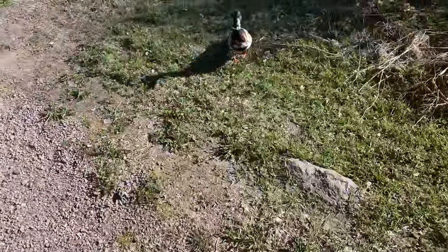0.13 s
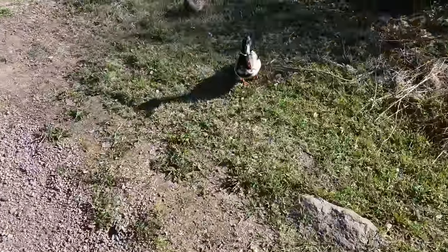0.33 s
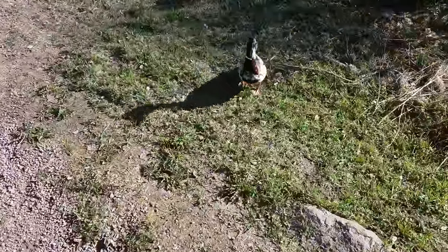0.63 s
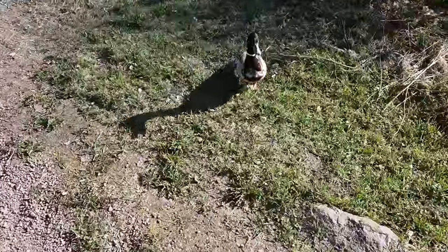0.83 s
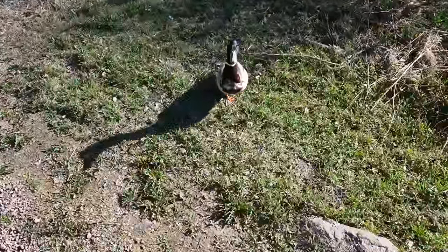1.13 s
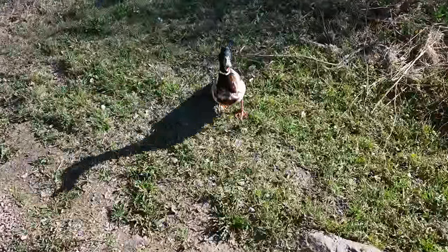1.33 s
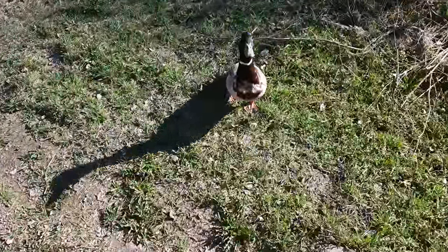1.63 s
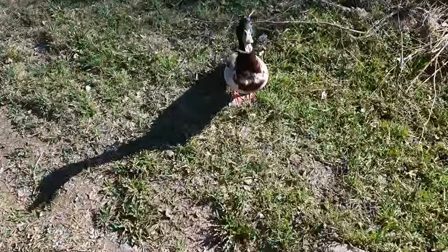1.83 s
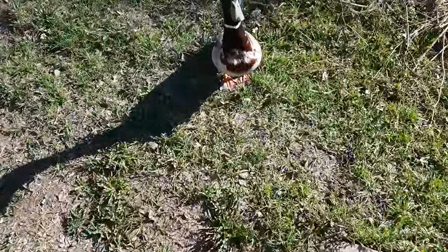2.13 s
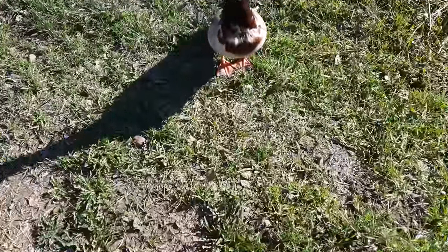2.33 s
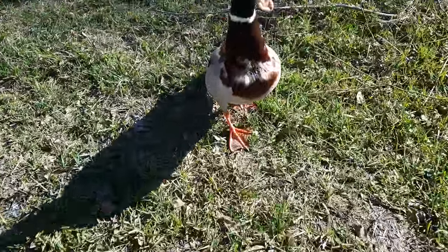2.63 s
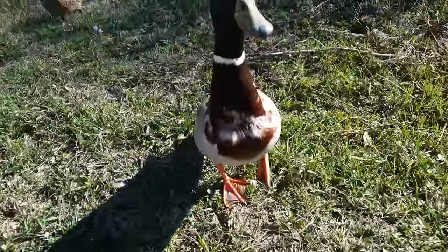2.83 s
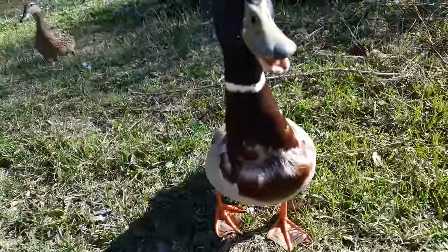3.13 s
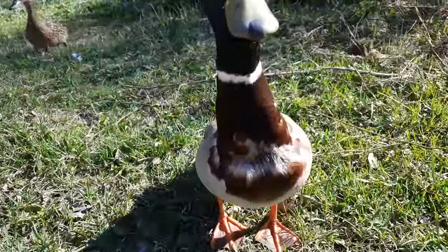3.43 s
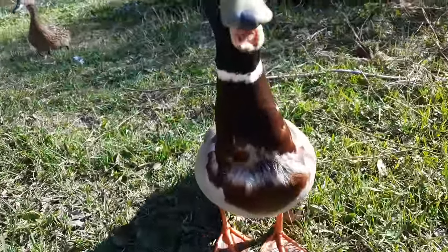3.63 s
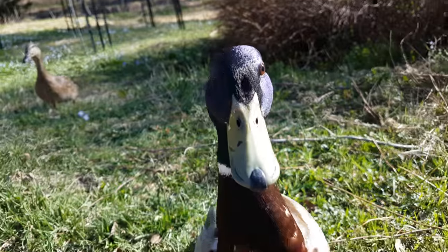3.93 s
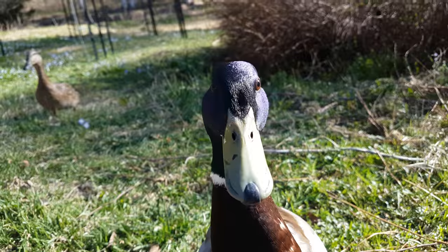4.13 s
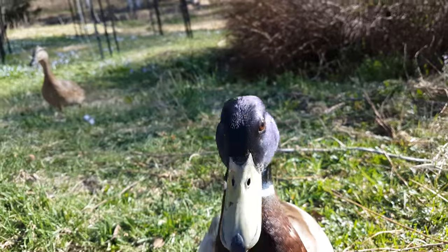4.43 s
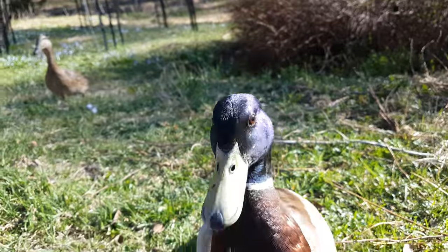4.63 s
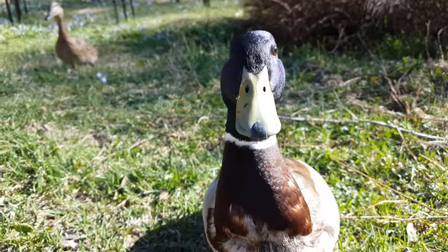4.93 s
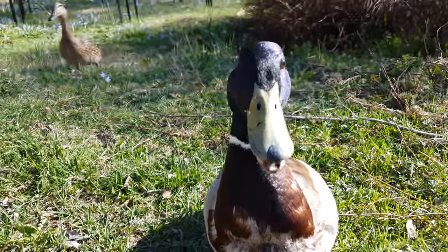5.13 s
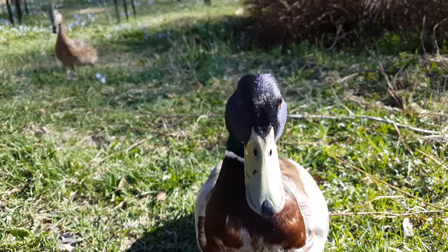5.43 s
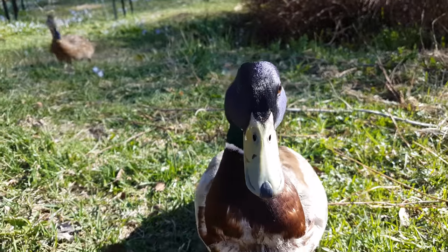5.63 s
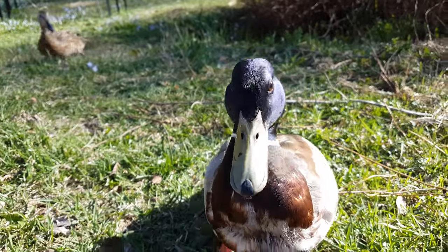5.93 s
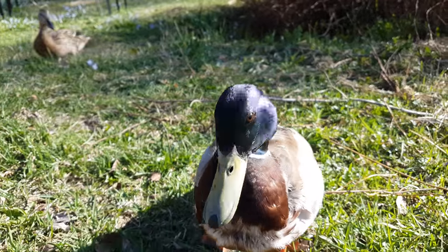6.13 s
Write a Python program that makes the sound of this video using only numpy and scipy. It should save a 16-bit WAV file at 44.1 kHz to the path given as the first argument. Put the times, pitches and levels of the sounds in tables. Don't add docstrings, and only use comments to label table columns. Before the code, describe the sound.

Dry, rattling duck quacks grow louder outdoors as feet tick and brush through grass, a twig cracks sharply, and a distant motor revs.

```python
import sys
import numpy as np
from scipy import signal
from scipy.io import wavfile
from scipy.ndimage import uniform_filter1d, map_coordinates

SR = 44100
rng = np.random.default_rng(int(sys.argv[2]) if len(sys.argv) > 2 else 0)


def to_wav(sig):
    pcm = np.clip(np.atleast_2d(sig), -1, 1) * 32767
    pcm = np.round(pcm).astype(np.int16)
    wavfile.write(sys.argv[1], SR, pcm.T)


def how_loud(loudness_db):
    steps = np.asarray(loudness_db, float) / 20
    return 10 ** steps


N = 277389


def unit(x):
    return x / np.sqrt(np.mean(x ** 2) + 1e-18)


def ring(x, hz, width_hz):
    return signal.lfilter(*signal.iirpeak(hz, hz / width_hz, SR), x)


def band(x, lo_hz, hi_hz, order=2):
    sos = signal.butter(order, [lo_hz, min(hi_hz, SR / 2.1)], "band", fs=SR, output="sos")
    return signal.sosfilt(sos, x)


def walk(rate_hz, size):
    k = max(int(SR / rate_hz), 2)
    steps = np.repeat(rng.standard_normal(size // k + 1), k)
    return 1.323 * uniform_filter1d(uniform_filter1d(steps, k), k)[:size]


def pan(x, db):
    return x * how_loud(np.array([[db / 2], [-db / 2]]))


def on_log(hz, table):
    row_hz, value = np.transpose(table)
    return np.interp(np.log(hz), np.log(row_hz), value)


def burst(t60_s, lo_hz, hi_hz, grit, apart):
    u = np.arange(2048) / SR - .0005
    noise = rng.standard_normal((3, len(u)))
    envelope = np.exp(np.minimum(u / 0.00033, -np.log(1000) * u / max(t60_s, .001)))
    x = grit * (noise[0] + apart * noise[1:]) * envelope
    x[:, np.argmax(u >= 0)] += 1
    x += 1e-9 * noise[1:]
    x = band(x, lo_hz, hi_hz)
    return x / np.abs(x).max()


def place(out, s, x):
    i = int(s * SR)
    out[:, i:i + 2048] += x


def air():
    # start_s, traffic_db, rustle_db, tyre_whoosh_db
    air_levels = [
        (0.0, -35, -50.5, 4),
        (2.03, -38, -54, 3),
        (2.98, -39, -49, 1.5),
        (3.68, -40.5, -56, 0),
        (5.45, -39, -58.5, 1.5),
        (6.29, -40.5, -54.5, 0),
    ]
    # hz, density_db
    air_colour = [(15, -49), (25, -12.5), (70, -10.5), (114, -12), (232, -14), (524, -10.5), (787, -11.5),
                  (3410, -25), (3700, -25.5), (9580, -35.5), (15200, -29.5), (16500, -56)]
    # hz, left_right_likeness
    air_alike = [(60, 0.29), (150, 0.56), (300, 0.7), (700, 0.37), (1400, 0.017), (16000, 0.01)]
    # hz, left_minus_right_db
    air_pan = [(60, 3), (200, 2.5), (1300, 1.5), (2400, -0.5), (15000, 2.5)]
    s, low_db, high_db, tyre_db = np.transpose(air_levels)
    t = np.arange(N) / SR
    low, high, tyres = np.interp(t, s, low_db), np.interp(t, s, high_db), np.interp(t, s, tyre_db)
    swell, grain = walk(5.34, N), walk(60, N)
    out = np.zeros((2, N))
    for hz in 25 * 2 ** np.arange(0, 9.6, .5):
        bright = np.clip(np.log2(hz / 600) / 2.7, 0, 1)
        alike = np.clip(on_log(hz, air_alike), 0, 1)
        mid, side = band(rng.standard_normal((2, N)), hz / 2 ** .25, hz * 2 ** .25)
        pair = np.sqrt(1 + alike) * mid + np.sqrt(1 - alike) * side * np.array([[1], [-1]])
        db = on_log(hz, air_colour) + (1 - bright) * (low + 47) + bright * (high + 60 + 1.9 * grain)
        db = db + tyres * np.exp(-np.log2(hz / 1450) ** 2 / 0.48)
        db = db + 0.45 * swell + (2.0 - 2.0 * bright) * walk(12, N) - 28
        out += pan(pair, on_log(hz, air_pan)) * how_loud(db)
    return out


def bird():
    # start_s, end_s, start_hz, end_hz, level_db
    whistles = [
        (0.001, 0.047, 7600, 7000, -55),
        (0.067, 0.18, 7440, 7150, -52.5),
        (.25, 0.34, 7400, 6960, -52.5),
        (3.882, 4.05, 2910, 3690, -60),
    ]
    out, t = np.zeros(N), np.arange(N) / SR
    for start, end, hz0, hz1, db in whistles:
        shape = np.clip(np.minimum(t - start, end - t) / 0.0072, 0, 1)
        hz = np.interp(t, [start, end], [hz0, hz1]) + 60 * walk(77, N)
        out += how_loud(db + 2.5 * walk(60, N)) * shape * np.sin(2 * np.pi * np.cumsum(hz) / SR)
    return pan(out, 0.1)


def knocks():
    # start_s, peak_db, pitch_hz, left_minus_right_db
    stones = [(0.042, -25, 2320, -4), (1.357, -41, 3500, 1.5), (1.5685, -19.5, 2300, -8),
              (1.582, -13.5, 2000, -1), (1.616, -23, 2440, -11), (1.776, -28, 2800, -5),
              (2.1146, -12.5, 1900, 10), (2.1157, -31, 1500, 3), (3.2065, -5, 3300, -4),
              (3.2076, -8, 1800, -2), (3.342, -30, 4500, 0), (4.5052, -28.5, 7500, 14),
              (4.823, -18, 1820, -1)]
    out = np.zeros((2, N + 2048))
    for s, db, hz, pan_db in stones:
        place(out, s, pan(how_loud(db) * burst(0.0035, hz / 2.28, hz, 0.29, 0.89), pan_db))
    return out[:, :N]


def smacks():
    # start_s, crack_peak_db, mouth_pop_db, middle_db, left_minus_right_db
    bill_smacks = [(0.1294, -14.5, -32, -26, 3), (0.4777, -19, -31, -27, 5), (0.896, -17.5, -32, -26, -1),
                   (1.3671, -13, -28, -23, 3), (1.9035, -21, -26, -26, 3.5), (2.269, -12.5, -25, -19.5, 3),
                   (2.688, -10, -22.5, -19.5, 2), (3.0989, -7, -20, -15.5, 2.5),
                   (3.6037, -26, -20, -20, 2.5), (4.2249, -36, -23, -27, 3.5),
                   (4.6103, -14, -22.5, -16.5, 7), (5.112, -11.5, -23, -27, 4.5),
                   (5.8256, -18.5, -25.5, -23, 4.5)]
    t60_s = 0.015
    out = np.zeros((2, N + 2048))
    for s, crack_db, pop_db, mid_db, pan_db in bill_smacks:
        x = how_loud(crack_db - 5.5) * burst(t60_s, 2300, 9800, 0.37, 0.94)
        x = x + how_loud(mid_db + 5.5) * burst(t60_s, 1030, 4100, 0.26, 0.98)
        x = x + how_loud(pop_db + 9.5) * burst(0.025, 456, 1180, 0.064, 0.26)
        place(out, s, pan(x, pan_db))
    return out[:, :N]


def effort(t, first, last, peak_db, rise_s, tiring_db, onset_db, release_db_per_s):
    # centre_s, change_db, half_length_s
    brief_changes = [(.545, -2, .01), (0.95, -0.5, .01), (.175, -1, .008), (.6, -1.5, .008), (.149, 2.5, .006),
                     (0.499, 1.5, .006), (0.527, -2, .006), (1.92, 1.5, .008), (2.308, 2.5, 0.011),
                     (2.277, -3, .005), (3.239, 3, .01), (3.628, 3, 0.0052), (3.704, -3.5, 0.0059),
                     (5.156, 3.5, 0.0063), (5.201, 1.5, .012), (5.233, -2, .007), (5.248, -4, 0.0064),
                     (5.126, -1, .008), (5.856, 2.5, .007), (2.83, -1.5, 0.0092), (3.139, 1.5, .008),
                     (3.162, -4, 0.0087), (3.211, 4.5, 0.0055), (3.642, 2, .015), (4.635, 3.5, 0.0059),
                     (4.702, 3.5, 0.014), (3.678, -4.5, 0.01), (3.726, -1, .02), (4.305, -3, .015),
                     (4.34, 1, .015), (4.68, -1, 0.011), (5.177, -0.5, 0.0078), (5.23, 1.5, 0.024),
                     (5.304, 5.5, 0.013), (5.84, -2, .008), (5.94, 2, 0.0069), (5.973, -3.5, 0.014)]
    peak = first - 0.014 + rise_s
    rise = onset_db * np.clip((peak - t) / rise_s, 0, 1)
    hold = tiring_db * np.clip((t - peak) / max(last - peak, .004), 0, 1) ** 2.38
    brief_change_db = sum(db * np.exp(-((t - s) / half_s) ** 2) for s, db, half_s in brief_changes)
    return peak_db + rise - hold - release_db_per_s * np.maximum(t - last, 0) + brief_change_db


def flutter(t, first, last, slowing):
    rate0_hz = 73.5
    rate1_hz = rate0_hz - 120 * (last - first)
    leak, gating = .14, 1.2
    beats = int(round((last - first) * (1 / (.5 / rate0_hz + .5 / rate1_hz))))
    periods = np.linspace(1 - slowing, 1 + slowing, beats)
    periods = periods * (last - first) / periods.sum()
    steps = np.r_[0, periods[[0, 0]], periods, periods[[-1, -1, -1]]]
    times = first - 2 * periods[0] + np.cumsum(steps)
    chance = np.clip(rng.standard_normal((40, 5)), -1.5, 1.5)
    times = times - .0022 + .0004 * chance[:len(times), 0]
    nearest = np.searchsorted((times[1:] + times[:-1]) / 2 + 0.0013, t)
    u = t - times[nearest]
    beat = chance[nearest].T

    sweep_s = 0.005977 * (1 + .2 * beat[1])
    hz = 1750 * (1 + 0.0609 * beat[2]) * np.exp(u / sweep_s) * (1 + 0.06 * walk(900, len(t)))
    hz = np.clip(hz, 900, 3000)
    size = how_loud(0.79 * beat[3])
    murmur = 0.29 * how_loud(4.8 * beat[0]) * np.exp(-((u + 0.0069) / 0.0036) ** 2)
    growth = np.exp((u - .0012) / 0.0044) + murmur
    swell = size * np.where(u < .0012, growth, np.exp((.0012 - u) / 0.0027))

    hiss = rng.standard_normal(len(t))
    tone = np.sin(2 * np.pi * np.cumsum(hz) / SR) * how_loud(1.5 * walk(600, len(t)))
    snap = size * how_loud(1.7 * beat[4]) * (u - .001) * np.exp(-((u - .001) / 0.00021) ** 2)
    rasp = (swell + 0.25) * band(hiss, 630, 3300)
    voiced = unit(swell * tone) + how_loud(-16.5) * unit(snap) + how_loud(-4) * unit(rasp)
    breath = unit((swell ** gating + leak) * hiss) + how_loud(-4) * unit(snap)
    return voiced, unit(breath)


def windpipe(voiced, t, sag, shut, slack_db, neck_hz, neck_db, sinking, swell_db):
    neck_width_hz = [197, 112, 144, 167, 219]
    pipe = 0
    for k, (hz, width, db) in enumerate(zip(neck_hz, neck_width_hz, neck_db)):
        early = ring(voiced, (1.014 + sinking / 2) * hz, width)
        late = ring(voiced, (1.011 - sinking / 2) * hz, width)
        mode = (1 - sag) * early + sag * late
        mode = (1 - shut) * mode + shut * ring(voiced, 0.94 * hz, width)
        mode = unit(ring(mode, hz, 2.76 * width))
        db = db + 1.77 * walk(33.0, len(t))
        db = db - 2.1 * shut * (k != 1) - 0.77 * shut * max(k - 1, 0)
        db = db + (swell_db * sag ** 2 - 3.0) * (k == 0)
        db = db + (k - 1.4051) * (0.38 * slack_db - 5.5 * (t - t[0]) * (k > 0))
        pipe = pipe + (-1) ** k * how_loud(db) * mode
    return unit(pipe)


def head(breath, cavity, top_db):
    # pitch_hz, width_hz, level_db
    cavities = [(3500, 390, 1), (3925, 340, 0), (4600, 370, -2), (5210, 290, -1.5), (6020, 430, 1.5),
                (6780, 580, -2), (8330, 470, -7.5), (8650, 200, -11), (10500, 7400, -10.5)]
    out = 0
    for k, (hz, width, db) in enumerate(cavities):
        mode = ring(ring(breath, cavity * hz, 0.77 * width), cavity * hz, 1.8 * width)
        db = db + top_db * (k > 5) + 3.6 * walk(26.0, len(breath))
        out = out + (-1) ** k * how_loud(db) * unit(mode)
    return unit(band(out, 3100, 17000))


def drake():
    # first_flutter_s, last_flutter_s, peak_db, rise_s, tiring_db
    syllables = [(.149, 0.19, -21.5, 0.0038, 3.5), (0.206, 0.266, -25, 0.046, 13),
                 (0.4959, 0.5522, -21, 0.015, 8), (0.57, 0.628, -24, 0.056, 9.5),
                 (0.906, 1.0202, -23, 0.023, 7.5), (1.0816, 1.1156, -28.5, 0.014, 5.5),
                 (1.379, 1.421, -24.5, 0.03, 2.5), (1.4582, 1.516, -26.5, 0.044, -0.5),
                 (1.912, 1.967, -23, 0.033, 2), (1.984, 2.045, -24, 0.013, 2.5),
                 (2.2894, 2.33, -14, 0.029, 6.5), (2.4087, 2.4538, -20, 0.04, 3.5),
                 (2.7075, 2.749, -15.5, 0.015, 4), (2.7897, 2.867, -17, 0.05, 13.5),
                 (3.1084, 3.183, -12.5, 0.022, 14), (3.199, 3.263, -15, 0.044, 8.5),
                 (3.616, 3.74, -13.5, 0.024, 3), (4.2412, 4.3712, -15.5, 0.033, 13.5),
                 (4.6271, 4.7377, -14, 0.027, 5), (5.1293, 5.2808, -15, 0.035, 5.5),
                 (5.845, 5.993, -15.5, 0.031, 9.5)]
    # second_hz, third_hz, then first_db, third_db, fourth_db against the second
    postures = [(1590, 1850, -8, -2, -8.5), (1577, 1880, -4, 0, -4), (1504, 1810, -7, -1, -2.5),
                (1425, 1750, -7, -4, -1.5), (1484, 2050, -16, -0.5, -11), (1450, 2110, -23, 0, -22),
                (1415, 1840, -5, 8, 3.5), (1326, 1770, -2.5, 5, -0.5), (1560, 2010, -3.5, 3, -5.5),
                (1520, 2000, -1, 7, -4.5), (1553, 2140, -22, -9.5, -12), (1525, 2040, -1, 0.5, -9),
                (1446, 1775, -3, 0, 2.5), (1390, 1760, -3.5, 3.5, 2.5), (1500, 1900, -10.5, 1.5, -2.3),
                (1387, 1870, -7.5, -2, -7.5), (1408, 1855, -5, 4.5, -3), (1436, 1870, -7.5, -1, -6.5),
                (1578, 2100, -9.5, -9, -17), (1543, 2050, -6, -3.5, -10.5), (1602, 2010, -4.5, -7.5, -11.5)]
    manners = [(-7, -3, 3, 900, 0.038), (-2, 0, 0, 900, 0.042), (-7, -4, -3, 900, 0.055),
               (-8, -0.5, -8, 900, 0.046), (-13, 1.5, -3, 900, .1), (-18, -5, -2, 900, .03),
               (-9, 2, 4, 900, 0.026), (-9, -4.5, 7, 1100, 0.031), (-8, 0, 0, 900, .06),
               (-9, -2, -2, 900, 0.068), (-8.5, 0, 1, 1500, 0.11), (-6.5, -3.5, 2, 1400, .08),
               (-14, 2.5, -0.5, 1300, 0.058), (-18, 1, 0.5, 1200, 0.184), (-28, 3, -7, 700, 0.25),
               (-9, -3, 6, 1500, 0.07), (-17, -3, 3, 1298, 0.0987), (-17, 0, 0, 900, 0.15),
               (-27, -1, -1, 1200, 0.111), (-14, 1, 7.5, 700, 0.13), (-14.5, -0.5, -5, 900, 0.21)]
    # first_hz, sinking_share, first_swell_db, fifth_minus_fourth_db, cavity_size_share
    stretches = [(1020, 0.032, -2, -10, 0.99), (1050, 0.036, 4, -11, 0.91), (960, 0.03, 3, -9, 1),
                 (990, .04, 0, -16, 0.94), (1020, 0.052, 3, -1, 0.96), (1040, 0.047, 0, -11, 0.9),
                 (1030, 0.021, 0, -13, 0.97), (1030, 0.03, -1, -8, 0.95), (1020, 0.061, -4, -5.5, 1),
                 (1040, 0.058, 3, -5, 1), (1000, 0.03, 0, -6.5, 0.99), (1060, 0.056, -2, -7, 0.98),
                 (1060, 0.037, 3, -5.5, 1), (1070, 0.034, -0.5, -7, 0.98), (1050, 0.042, 0, -6, 1),
                 (1050, 0.065, -4, -4, 0.99), (1016, 0.06, 2.5, -12, 0.94), (1053, .04, 1, -9.5, 0.99),
                 (1050, .03, 3.5, -9, 0.95), (1060, 0.05, -3, -9.5, 1), (1060, .02, -4, -14, 1)]
    # start_s, left_minus_right_db, right_lag_samples
    bearing = [
        (0, 3, .1),
        (2.0, 3, .15),
        (2.7, 1, 0.22),
        (3.2, 1, 1.55),
        (4.4, 3.5, 2.22),
        (6.29, 1.5, 0.9),
    ]
    out = np.zeros((2, N))
    when, pans_db, lags = np.transpose(bearing)
    for syllable, posture, manner, stretch in zip(syllables, postures, manners, stretches):
        first, last, peak_db, rise_s, tiring_db = syllable
        second, third, first_db, third_db, fourth_db = posture
        onset_db, breath_db, top_db, release, slowing = manner
        lowest, sinking, swell_db, fifth_db, cavity = stretch
        neck_hz = [lowest, second, third, third + 475, third + 1070]
        neck_db = [first_db, 0, third_db, fourth_db, fourth_db + fifth_db]
        i = int((first - .015) * SR) + np.arange(512 * round((last - first + .055) * SR / 512))
        t = i / SR
        level_db = effort(t, first, last, peak_db, rise_s, tiring_db, onset_db, release)
        slack_db = np.maximum(level_db - peak_db, -22)
        sag = (t - t[0]) / (t[-1] - t[0])
        closing = 0.5 * np.clip((t - first) / (last - first), 0, 1.2) ** 5
        shut = np.clip(np.exp(-(t - first + 0.012) / 0.013) + closing, 0, 1)

        voiced, breath = flutter(t, first, last, slowing)
        call = windpipe(voiced, t, sag, shut, slack_db, neck_hz, neck_db, sinking, swell_db)
        chest = ring(ring(voiced, 584, 226), 584, 226)
        head_db = -19 + breath_db - 31 * (t - t[0]) + 0.12 * slack_db
        call = call + how_loud(-27) * unit(chest) + how_loud(head_db) * head(breath, cavity, top_db)
        fade = np.clip(np.minimum(t - t[0], t[-1] - t) / .008, 0, 1)
        out[:, i] += pan(call * fade * how_loud(level_db), np.interp(first, when, pans_db))
    n = np.arange(N)
    out[1] = map_coordinates(out[1], [n - np.interp(n / SR, when, lags)], order=3)
    return out


def ground(x):
    u = np.arange(4096) / SR
    tail = band(rng.standard_normal((2, len(u))), 100, 7300, order=1)
    tail = tail * np.exp(-np.log(1000) * u / 0.049) * (u > .002)
    return how_loud(-17) * signal.fftconvolve(x, tail / np.sqrt(np.sum(tail[0] ** 2)), axes=1)[:, :N]


def ticks():
    # start_s, crack_peak_db, middle_db, thud_db, left_minus_right_db
    snaps = [(0.2321, -39, -23, -29, 13), (0.7647, -22.5, -51, -41, 9), (0.7842, -22.5, -31, -41, -1),
             (1.244, -29, -57, -52, 11), (1.279, -34, -50, -27, 2), (1.293, -12.5, -50, -48, 3),
             (1.71, -33, -42, -47, 2), (2.115, -29, -14.5, -36, -15.5), (2.2422, -32, -53, -24, 4),
             (2.552, -40, -52, -27, 3), (3.2054, -3.5, -5, -21, 3), (3.303, -35, -48, -38, -3),
             (4.439, -48, -39, -50, -5.5), (4.505, -51, -33, -40, 8), (4.5175, -39, -32, -46, -7),
             (4.785, -45, -52, -32.5, -6), (4.42, -52, -43, -50, 0), (.283, -55, -42, -38, 0),
             (1.545, -55, -45, -40, 0), (4.92, -42, -39, -58, -9), (5.021, -43, -37, -45, -5),
             (6.241, -40, -39, -50, 6)]
    t60_s = 0.0067
    out = np.zeros((2, N + 2048))
    for s, crack_db, mid_db, thud_db, pan_db in snaps:
        x = how_loud(crack_db + 1.0) * burst(t60_s, 5900, 15900, 0.97, 1.0)
        x = x + how_loud(mid_db + 3.5) * burst(t60_s, 2250, 4540, 0.14, 0.64)
        x = x + how_loud(thud_db + 7.0) * burst(t60_s, 120, 2150, 0.12, 1.0)
        place(out, s, pan(x, pan_db))
    return out[:, :N]


def thumps():
    # start_s, peak_db, decay_s
    footfalls = [(0.47, -28.5, 0.061), (.5, -28, .12), (.31, -37, .1), (1.77, -33, .1), (0.931, -33, 0.046),
                 (2.64, -37, .08), (2.85, -33, .1), (2.999, -32, .08), (3.655, -38, .1), (5.17, -32.5, .1),
                 (1.892, -32, 0.046), (2.031, -41, 0.058), (2.116, -24, 0.05), (2.29, -26, 0.09),
                 (2.409, -24.5, 0.1), (2.728, -31, 0.062), (3.241, -35, 0.069), (3.421, -51, .05),
                 (3.698, -32, 0.063), (4.809, -26.5, 0.11)]
    out = np.zeros((2, N + 2048))
    fade = np.hanning(4096)[2048:]
    for s, db, t60_s in footfalls:
        place(out, s, how_loud(db) * burst(t60_s, 48, 240, 0.86, 0.87) * fade)
    return out[:, :N]


def stalks():
    # start_s, peak_db, left_minus_right_db, lowest_hz
    crackles = [(0.3825, -34, 1.5, 5200), (0.831, -25, 9, 5200), (0.89, -22, 14, 5200),
                (1.031, -28, 12, 5200), (1.0655, -36, 7, 5200), (1.2302, -24, 8, 5200),
                (1.235, -28, 6, 5200), (1.2945, -16, 14, 10900), (1.3575, -27, 2, 5200),
                (1.3844, -25, 2, 5200), (1.73, -38, 5, 8000), (3.0965, -30, 2, 5200), (3.186, -37, 0, 7000),
                (3.265, -30, 0, 4500), (1.818, -35, 13, 5200), (2.1146, -26, -6, 8000),
                (2.5365, -24, -9, 12000), (2.713, -26, 0, 9000), (2.785, -40, 0, 7000),
                (2.875, -32, 0, 9500), (2.982, -37, 0, 11000), (3.3546, -31, 15, 5200),
                (3.6378, -23, -23, 7460), (4.881, -40, 0, 10000), (4.932, -44, 0, 4500),
                (5.3273, -22, 4.5, 5160)]
    out = np.zeros((2, N + 2048))
    for s, db, pan_db, low_hz in crackles:
        place(out, s, pan(how_loud(db + 2.0) * burst(0.0083, low_hz, 18700, 1.4, 5.9), pan_db))
    return out[:, :N]


def brushes():
    # start_s, end_s, level_db
    strokes = [(0.899, 0.965, -40), (1.273, 1.292, -37), (1.474, 1.586, -44), (1.58, 1.66, -49),
               (2.548, 2.61, -46), (2.64, 2.698, -40), (2.97, 3.005, -47), (3.35, 3.389, -42.5),
               (3.418, 3.454, -37.5), (3.488, 3.517, -46), (6.078, 6.142, -45.5)]
    t = np.arange(N) / SR
    level = 0
    for start, end, db in strokes:
        level = level + how_loud(db) * np.clip(np.minimum(t - start, end - t) / 0.017, 0, 1)
    hiss = unit(band(rng.standard_normal((2, N)), 1000, 10500, order=1))
    return level * how_loud(2.0 * walk(190, N)) * hiss


def twig():
    # pitch_hz, level_db, decay_s
    wood_modes = [(1370, -17, 0.01), (2800, 2, 0.011), (3300, -8.5, 0.0071), (4540, -11, 0.0095),
                  (5270, -9.5, 0.011), (7000, -15, 0.0082), (9350, -12, 0.004), (13300, -18, .006)]
    u = np.maximum(np.arange(N) / SR - 3.2056, 0)
    out = np.zeros(N)
    for hz, db, t60_s in wood_modes:
        out += how_loud(db) * np.sin(2 * np.pi * hz * u) * np.exp(-np.log(1000) * u / t60_s)
    return pan(out, -2.9)


def motor():
    # start_s, load_db
    load = [
        (3.6, -62),
        (3.95, -50),
        (4.35, -45.5),
        (4.7, -52),
        (5.3, -46.5),
        (6.05, -46),
        (6.29, -50.5),
    ]
    from_s, start_hz, climb_hz_per_s = 3.6, 54.3, 10.6
    s, db = np.transpose(load)
    t = np.arange(N) / SR
    hz = (start_hz + climb_hz_per_s * (t - from_s)) * (1 + 0.0201 * walk(25, N))
    phase = 2 * np.pi * np.cumsum(hz) / SR
    note = np.sin(phase) + how_loud(-13.5) * np.sin(2 * phase)
    note = note + how_loud(-9) * np.sin(3 * phase) + how_loud(-13.5) * np.sin(4 * phase)
    level = (t > from_s) * how_loud(np.interp(t, s, db) + 2.0 * walk(11, N))
    return pan(note * np.sqrt(2) * level, 1.3)


def scene():
    duck = drake() + smacks()
    underfoot = knocks() + ticks() + thumps() + stalks() + brushes() + twig()
    return duck + ground(duck) + underfoot + air() + motor() + bird()


def band_limit(x):
    return signal.sosfilt(signal.butter(12, 17080, fs=SR, output="sos"), x)


def record(dry):
    hiss = how_loud(-59.5) * unit(band(rng.standard_normal(dry.shape), 6700, 22000))
    top_cut = signal.cheby2(16, 24, 16250, fs=SR, output="sos")
    wet = signal.sosfiltfilt(top_cut, dry + hiss)
    wet = np.clip(wet - .0048, -1, 1)
    return band_limit(wet)


dry = scene()
out = record(dry)
to_wav(out)
```